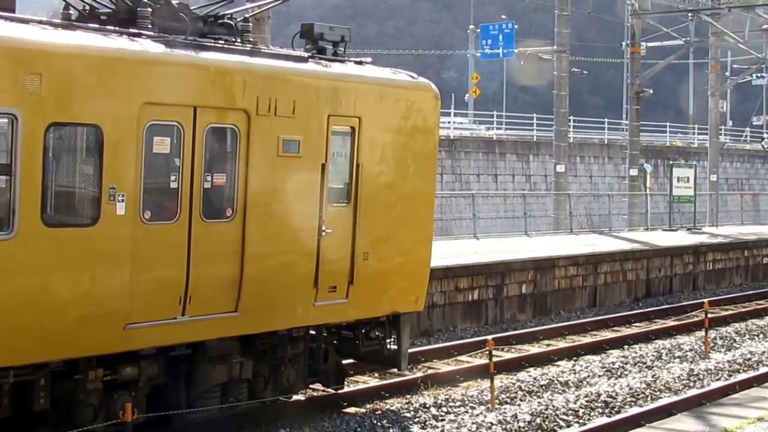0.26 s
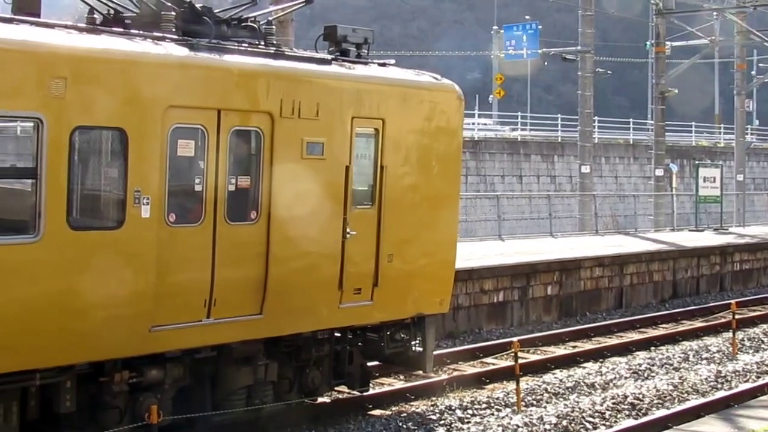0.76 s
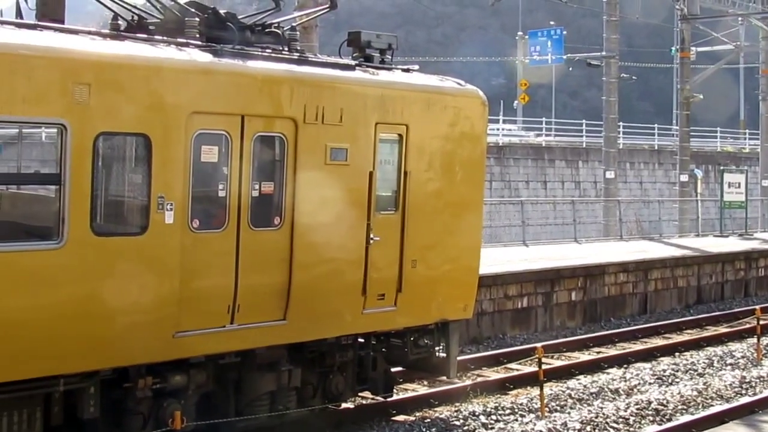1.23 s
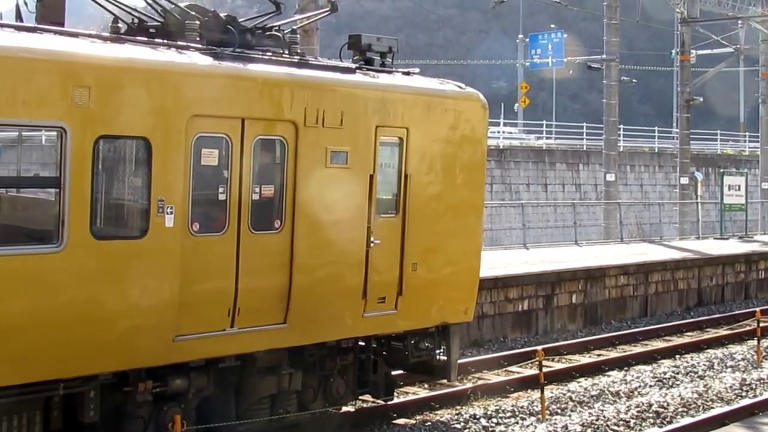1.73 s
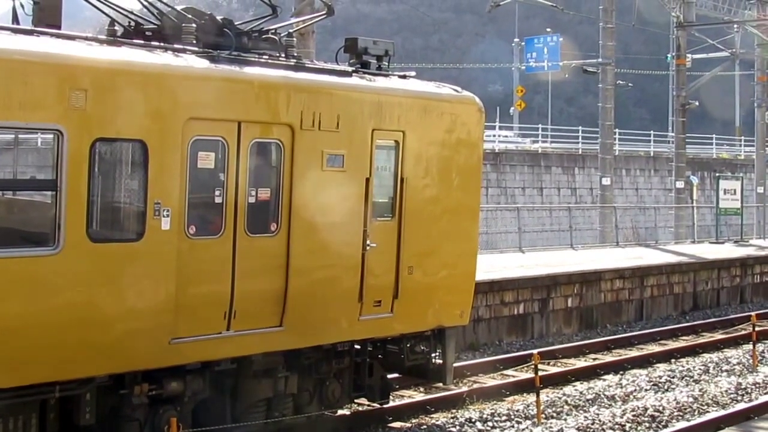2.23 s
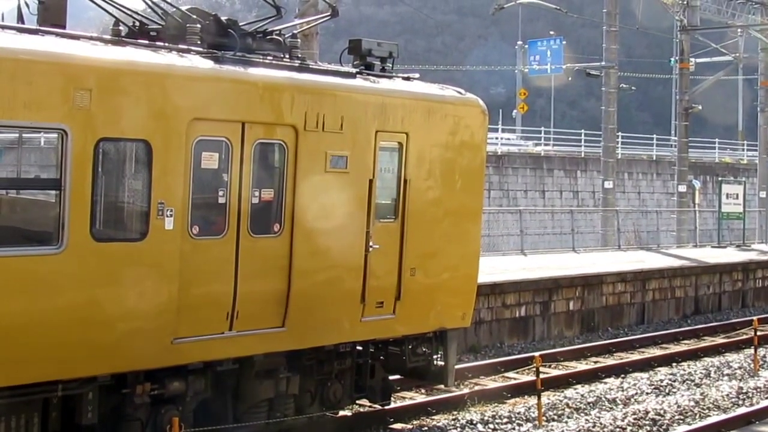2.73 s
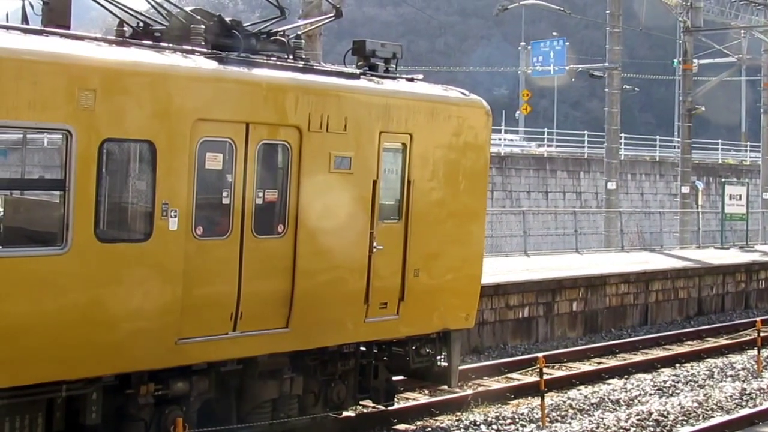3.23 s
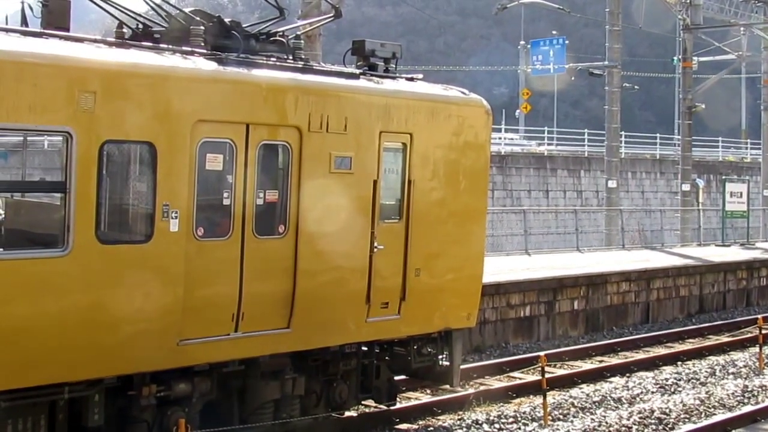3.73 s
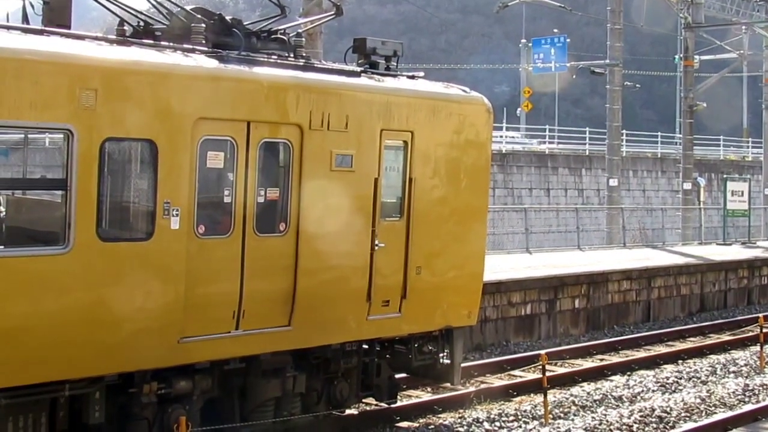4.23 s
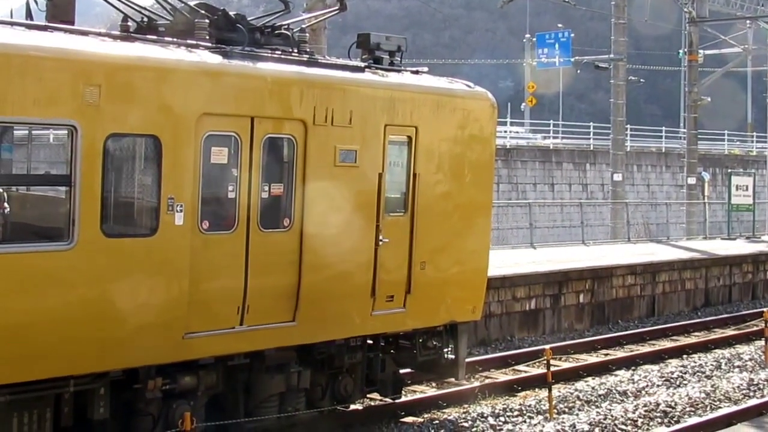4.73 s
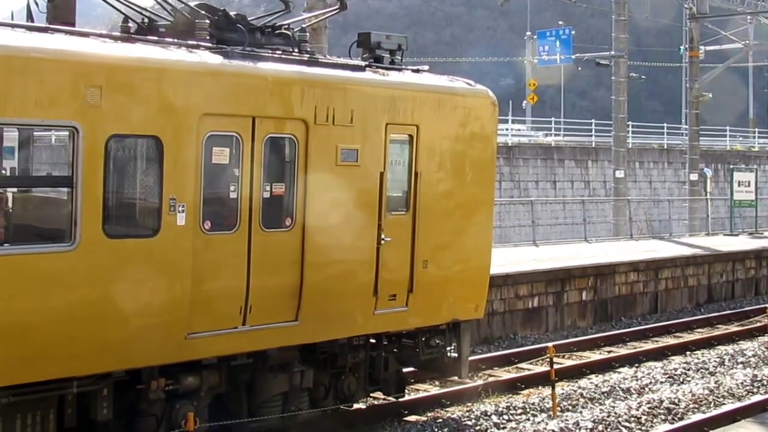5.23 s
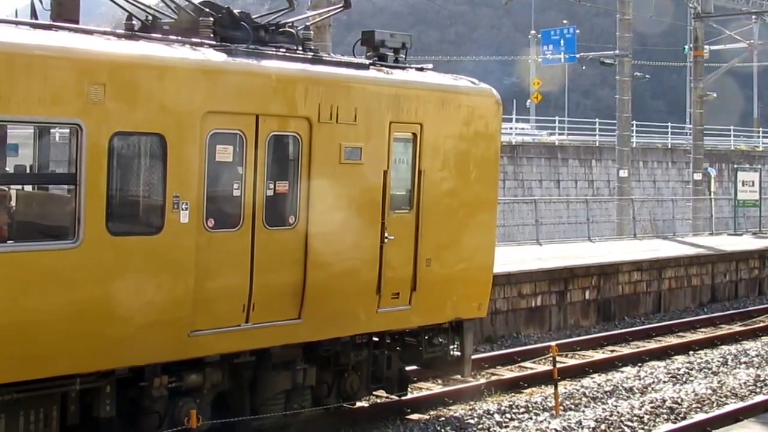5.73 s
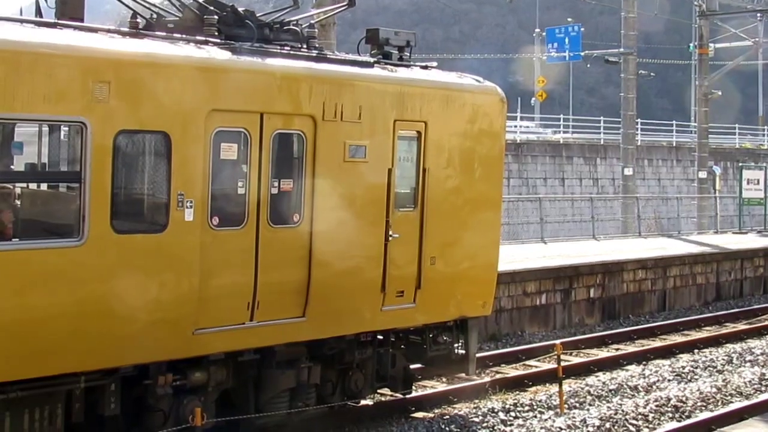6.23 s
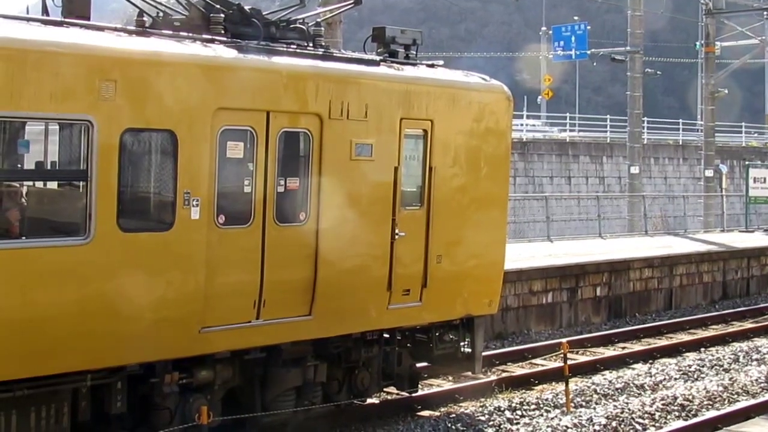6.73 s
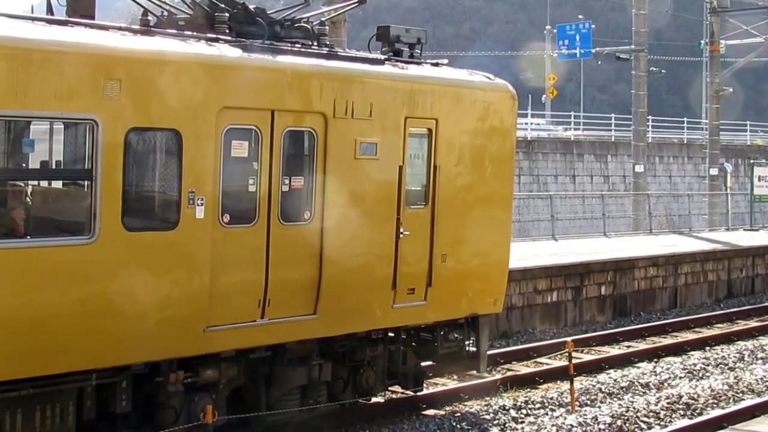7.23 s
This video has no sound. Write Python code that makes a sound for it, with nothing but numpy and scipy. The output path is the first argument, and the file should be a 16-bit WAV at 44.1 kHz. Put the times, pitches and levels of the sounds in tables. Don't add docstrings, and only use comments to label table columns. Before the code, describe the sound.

Outdoors at a station platform, a stationary electric train throbs with a fast compressor beat, airy fan noise and a steady motor whine. After two seconds, heavy wind bursts on the stereo microphone, rumbling and snapping from side to side, and the train sinks beneath it. Near the end the wind dies and the train hum slowly rises.

```python
import sys
import numpy as np
from scipy import signal
from scipy.fft import rfft, irfft
from scipy.io import wavfile
from scipy.ndimage import uniform_filter1d, map_coordinates

SR = 44100
rng = np.random.default_rng(int(sys.argv[2]) if len(sys.argv) > 2 else 0)


def dump_mix(stems):
    frames = np.atleast_2d(stems).T
    limited = np.clip(frames, -1, 1)
    pcm = np.round(limited * 32767).astype(np.int16)
    wavfile.write(sys.argv[1], SR, pcm)


def boost(x):
    u = np.asarray(x, float) / 20
    return 10 ** u


N = 329427
TIME_S = np.arange(N) / SR
HZ = np.fft.rfftfreq(N, 1 / SR)


def at_hz(points, hz):
    table_hz, value = np.array(points)[:, :2].T
    return np.interp(np.log(hz + 1e-6), np.log(table_hz), value)


def drift(rate_hz):
    knots = rng.standard_normal(1200)
    places = np.arange(0, N + 32, 32) / SR * min(rate_hz, 150)
    return map_coordinates(knots, [places], order=3).repeat(32)[:N]


def add(x, at_s, piece):
    start = round(at_s * SR) - len(piece) // 2
    a, b = max(start, 0), min(start + len(piece), N)
    x[a:b] += piece[a - start:b - start]


# start_s, rate_hz (turns per second)
SHAFT_SPEED = [(0, 15.004), (2.4, 14.999), (3.6, 14.992), (5.4, 14.985), (6, 14.974), (7.47, 14.966)]


def shaft_turns():
    start_s, rate_hz = np.transpose(SHAFT_SPEED)
    return np.cumsum(np.interp(TIME_S, start_s, rate_hz)) / SR


# (per Hz, over hiss)
AIR_NOISE = [(25, -30), (100, -18.5), (230, -14), (340, -15.5), (480, -22), (650, -18), (950, -19),
             (1060, -20), (1220, -23.5), (2300, -30.5), (3600, -38), (7300, -36), (8700, -41),
             (13800, -43.5)]
# pitch_hz, common_share (power, 0-1)
COHERENCE = [(50, .4), (130, .88), (630, .9), (1400, .78), (3000, .7), (6600, .42), (14000, .4)]


def air_noise(turns, patchy_db=0.23, throb_db=1.0, throb_at=0.49):
    common = at_hz(COHERENCE, HZ)
    shares = np.sqrt(SR / 2 * np.array([common, 1 - common, 1 - common]))
    parts = rfft(rng.standard_normal((3, N))) * boost(at_hz(AIR_NOISE, HZ)) * shares
    stroke = np.cos(2 * np.pi * (turns - throb_at))
    together = drift(8)
    out = 0
    for octave in range(10):
        band = np.clip(1 - abs(np.log2(HZ / 30 + 1e-9) - octave), 0, 1)
        throb = throb_db * stroke * np.exp(-((octave - 6.3) / 1.5) ** 2)
        patchy = patchy_db * (together + (0.5 + 0.087 * octave) * drift(13))
        out = out + boost(patchy + throb) * irfft(band * parts, N)
    return out[0], out[1:]


WHINE_PITCHES = [356.7, 1288.8, 2445.6, 2323.1, 2745, 3515.3, 3698.7, 5172, 5517]
# level_db (over hiss), pan_db (left minus right)
WHINE_LEVELS = [(6.5, 5), (-10.5, 9), (-6, 1), (-43, 1), (-20.5, 8), (-22.5, 21), (-28, 1), (-18.5, -2),
                (-21, 6)]


def whines():
    out = 0
    for pitch_hz, (level_db, pan_db) in zip(WHINE_PITCHES, WHINE_LEVELS):
        tone = np.sin(2 * np.pi * (pitch_hz * TIME_S + rng.random()) + 0.41 * drift(2.15))
        pan = boost([[pan_db / 2], [-pan_db / 2]])
        out = out + np.sqrt(2) * boost(level_db + 0.7 * drift(9)) * tone * pan
    return out


# order (multiple of shaft rate), level_db (over hiss)
THUMP_ORDERS = [(8, -4.5), (9, 7.5), (10, 3.5), (11, 9.5), (12, 12), (14, -6)]
# order (multiple of shaft rate), level_db (over hiss)
CASING_ORDERS = [(2, -10.5), (3, -16), (4, -4.5), (5, -6), (6, -8), (16, -5), (18, -2), (20, 0.5),
                 (21, -1.5), (22, -3), (23, -10), (24, -9.5), (31, -9), (32, -6.5), (42, -7), (44, -7),
                 (45, -9), (49, -14), (50, -13), (54, -13), (56, -9), (59, -3.5), (60, -9), (61, -4.5),
                 (64, -2.5), (68, -9.5), (72, 0), (73, -5.5), (74, -7.5), (99, -12)]


def compressor(turns, thump_at=0.63, casing_lag=0.039, wobble_db=3.0):
    gear_mesh, gear_db = 33.905, 11
    out = boost(gear_db + 0.5 * drift(3.4)) * np.sin(2 * np.pi * gear_mesh * turns)
    for order, level_db in THUMP_ORDERS:
        phase = order * (turns - thump_at) - casing_lag * (order - 11) ** 2
        out += boost(level_db + 0.5 * drift(6)) * np.cos(2 * np.pi * phase)
    wobbles = [drift(6) for _ in range(8)]
    for order, level_db in CASING_ORDERS:
        level = boost(level_db + wobble_db * wobbles[int(order) % 8])
        waver = order / 130 * wobbles[int(order + 3) % 8]
        out += level * np.cos(2 * np.pi * (order * turns + rng.random()) + waver)
    return np.sqrt(2) * out


# start_s, level_db, climb_db_per_s
DUCKS = [(0, -34, -1.5), (0.77, -35.5, 2.4), (1.215, -38.5, 4), (1.76, -37.5, 3.5), (2.27, -42.5, 22),
         (2.465, -51, 4), (2.82, -52.5, 19), (3.255, -56, 9), (3.745, -57, 29.5), (3.92, -57, 1),
         (4.9, -56.5, 9), (5.53, -50.5, 4.4)]


def gain_control():
    half_duck_s = 0.038
    start_s, level_db, climb = np.transpose(DUCKS)
    low_s = start_s + half_duck_s
    end_s = np.append(start_s[1:], N / SR + half_duck_s) - half_duck_s
    end_db = level_db + climb * (end_s - low_s)
    return np.interp(TIME_S, np.ravel([low_s, end_s], "F"), np.ravel([level_db, end_db], "F"))


def eddy(pitch_hz, cycles, phase):
    turns = np.arange(-6 * cycles, 6 * cycles, pitch_hz / SR)
    return np.cos(2 * np.pi * (turns + phase)) / np.cosh(1.01 * turns / cycles) ** 2


# relative_pitch (cycles per eddy cycle), level_db
TURBULENCE = [(.08, -19), (.3, -2.5), (.9, -1), (1.5, -6.5), (2.2, -11.5), (3.2, -25.5), (5, -50.5)]


def turbulence(eddies, gustiness=0.5, top_hz=340.7):
    start_s, _, pitch_hz, _ = np.transpose(eddies)
    size = 2 ** 17
    tilt = boost(at_hz(TURBULENCE, np.fft.rfftfreq(size, 1 / 32)))
    pattern = irfft(rfft(rng.standard_normal((2, size))) * tilt)
    pattern /= np.sqrt(uniform_filter1d(pattern ** 2, size=64))
    effort = np.clip(np.interp(TIME_S, start_s, 0.85 * pitch_hz + 20) / top_hz, 0, 1)
    effort = uniform_filter1d(effort, size=2600)
    flicker = np.tanh(0.8 * uniform_filter1d(drift(130), size=64)) / 0.7
    speed = 1.1 * top_hz * effort * 2 ** (gustiness * effort * flicker)
    travel = 32 * np.cumsum(speed) / SR
    return [map_coordinates(p, [travel], order=1, mode="wrap") for p in pattern]


# start_s, level_db (usual eddy peak), pitch_hz, left_share (0-1)
GUSTS = [(0.1, -28, 164.6, .1), (0.42, -14, 170, .3), (1.35, -15.5, 160, .9), (2.05, -24.5, 160.3, .1),
         (2.32, -20, 119.8, .1), (2.62, -3, 260.6, .99), (2.8, -10, 249.6, .99), (3.0, -18, 140.2, .05),
         (3.35, -7.5, 299.7, .9), (3.7, -9, 260, .85), (4.28, -4, 310, .6), (4.63, -6.5, 281.2, .95),
         (4.82, -6, 309.8, .3), (5.0, -8.5, 280, .9), (5.11, -4, 319.6, .99), (5.2, -8.5, 249.7, .7),
         (5.45, -13, 199, .05), (5.8, -28, 150, .1), ]
# start_s, level_db (peak), pitch_hz, port (+1 left, -1 right)
STRONG_EDDIES = [(1.197, -0.5, 185, 1), (2.224, 1, 107, -1), (2.267, 1, 219, -1), (2.299, 3.5, 112.5, -1),
                 (2.437, 6.5, 192.8, -1), (2.477, 6.5, 207, 1), (2.538, -1, 258.3, 1),
                 (2.648, -3.5, 469, 1), (2.798, -1.5, 486.4, 1), (2.868, -4.5, 262.3, 1),
                 (3.231, 8.5, 173.8, 1), (3.256, -1, 172, -1), (3.28, -2, 330, 1), (3.501, -2.5, 202.7, -1),
                 (3.57, -1, 237, 1), (3.62, -1, 207, 1), (3.74, 0, 313.7, 1), (3.761, -2, 371, 1),
                 (3.899, 0.5, 166.3, 1), (3.921, -1, 374.7, 1), (4.3, -6, 330, 1), (4.392, -2, 502, 1),
                 (4.408, -4, 293, 1), (4.447, -1.5, 301, 1), (4.497, 1.5, 311, 1), (4.806, -0.5, 327.3, -1),
                 (4.839, -1, 352, -1), (5.1585, -4, 501, 1), (5.31, -3, 230, -1), (5.354, -1.5, 291, -1)]
# start_s, level_db (above 900 Hz), pitch_hz
SNAPS = [(2.4853, -26, 757), (2.6478, -28, 700), (2.798, -20, 1262), (3.2784, -20, 820.5),
         (3.3012, -18.5, 608), (3.3525, -20.5, 500.3), (3.398, -28, 640), (3.6078, -11, 1760),
         (3.629, -21.5, 759.5), (3.731, -31, 788.6), (3.7503, -16, 936), (3.843, -31, 705),
         (3.9209, -22, 1627), (3.978, -21, 684.6), (4.177, -25, 669), (4.2429, -22.5, 551),
         (4.28, -18.5, 562.2), (4.3214, -19, 648.4), (4.3921, -23, 722.2), (4.453, -21, 555.8),
         (4.5027, -18, 755), (4.5574, -17, 740), (4.5906, -18.5, 1095), (4.682, -17, 1399),
         (4.7143, -22, 522), (4.7662, -19, 669.6), (4.8151, -23, 527.7), (4.9094, -28, 553),
         (4.939, -21.5, 638), (5.1584, -20, 944)]


def small_eddies(count=300):
    gap_s, spread_db, spread_oct = 0.026, 4.5, 0.25
    carrier_db = 2.5
    snap_share, snap_db, snap_hz = 0.35, -21.5, 640
    gap, size, pitch, side, chance = rng.random((5, count + len(SNAPS)))
    snapped_s = np.array(SNAPS)[:, 0]
    start_s = np.append(gap_s * (np.arange(count) + 0.7 * gap[:count]), snapped_s)
    listed = np.arange(len(start_s)) >= count
    knots_s, *columns = np.transpose(GUSTS)
    gust_db, gust_hz, left_share = [np.interp(start_s, knots_s, c) for c in columns]
    level_db = gust_db + np.where(listed, carrier_db, spread_db * (0.5 + np.log(size + 0.01)))
    pitch_hz = gust_hz * 2 ** (spread_oct * (2 * pitch - 1))
    eddies = np.transpose([start_s, level_db, pitch_hz, np.where(side < left_share, 1, -1)])
    strong_s = np.array(STRONG_EDDIES)[:, 0]
    free = (abs(start_s[:, None] - strong_s).min(axis=1) > 0.012) & (start_s < N / SR)
    free &= listed | (abs(start_s[:, None] - snapped_s).min(axis=1) > 0.014)
    snaps = np.transpose([start_s, gust_db + snap_db + 4 * size, snap_hz * 2 ** (0.6 * (pitch - 0.5))])
    return eddies[free], snaps[free & ~listed & (gust_hz > 280) & (chance < snap_share)]


def wind(hiss_db, cycles=0.37, wake_db=-11.5, wake_s=0.017, breeze_db=14.0):
    ports, wake = np.zeros((2, N)), np.zeros((2, N))
    snap_turn = 0.35
    bell = np.cosh(np.arange(-4 * wake_s, 4 * wake_s, 1 / SR) / wake_s) ** -4
    small, crackle = small_eddies()
    eddies = np.vstack([STRONG_EDDIES, small])
    snaps = np.vstack([SNAPS, crackle])
    for start_s, level_db, pitch_hz, port in eddies:
        near, far = int(port < 0), int(port > 0)
        fast = max(np.log2(pitch_hz / 330), 0)
        phase = snap_turn if fast > 0.3 else rng.random()
        add(ports[near], start_s, boost(level_db - 1.5 + 8.7 * fast) * eddy(pitch_hz, cycles, phase))
        slow_db = 3 * min(np.log2(pitch_hz / 250), 0)
        level_db = level_db - 16 * fast + slow_db + wake_db
        add(wake[near], start_s, boost(2 * level_db) * bell)
        add(wake[far], start_s, boost(2 * (level_db - 7.0)) * bell)
    gust_s, _, _, left_share = np.transpose(GUSTS)
    for start_s, level_db, pitch_hz in snaps:
        body_db = 8 + 9 * np.log2(1000 / pitch_hz)
        phase = snap_turn + 0.21 * (rng.random() - 0.5)
        windward = int(np.interp(start_s, gust_s, left_share) < 0.5)
        add(ports[windward], start_s, boost(level_db + body_db) * eddy(pitch_hz, 0.4, phase))
    for place, size, pitch, phase in rng.random((160, 4)):
        level_db = hiss_db[int(place * N)] + breeze_db - 14 * size
        flutter = eddy(30 * 2 ** (1.8 * pitch), 0.45, phase)
        add(ports[int(phase < 0.5)], place * N / SR, boost(level_db) * flutter)
    return ports + np.sqrt(wake) * turbulence(eddies[np.argsort(eddies[:, 0])])


def widen(ports, share=0.72, cut_hz=1160.0):
    r = np.exp(-2 * np.pi * cut_hz / SR)
    return ports - share * signal.lfilter([1 - r], [1, -r], ports[::-1])


# pitch_hz, pan_db (left minus right)
BALANCE = [(60, 6), (120, -1), (240, 0), (470, 0.0), (930, 1.5), (1840, 1.5), (3660, 1), (7260, 3.5),
           (14400, -1.5)]


def scene():
    hiss_db = gain_control()
    turns = shaft_turns()
    direct, diffuse = air_noise(turns)
    lead = np.exp(1j * np.pi * HZ * 1.25 / SR)
    lean = boost(at_hz(BALANCE, HZ) / 2)
    located = rfft(direct + compressor(turns)) * [lead, 1 / lead]
    train = irfft((located + rfft(diffuse)) * [lean, 1 / lean], N)
    return boost(hiss_db) * (train + whines()) + widen(wind(hiss_db))


def top_cut(x):
    return signal.sosfilt(signal.butter(12, 15010, fs=SR, output="sos"), x)


# pitch_hz, width_hz, mid_db, side_db
NOTCHES = [(3940, 220, -9, -30), (7860, 90, -22, -30)]


def record(dry):
    pair = rfft([dry[0] + dry[1], dry[0] - dry[1]]) / 2
    for pitch_hz, width_hz, mid_db, side_db in NOTCHES:
        dip = np.exp(-((HZ - pitch_hz) / width_hz * 2) ** 2)
        pair = pair * boost(np.outer([mid_db, side_db], dip))
    falling_top = boost(-30 * np.clip(HZ - 13900, 0, None) / 1000)
    mid, side = irfft(pair * falling_top, N)
    loud = np.array([mid + side, mid - side])
    return top_cut(loud / (1 + loud ** 6) ** (1 / 6))


dry = scene()
out = record(dry)
dump_mix(out)
```